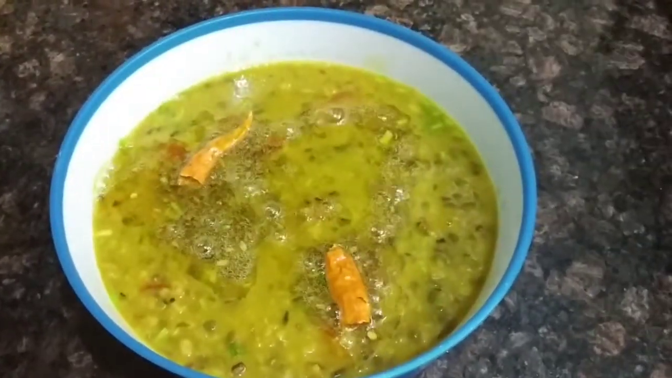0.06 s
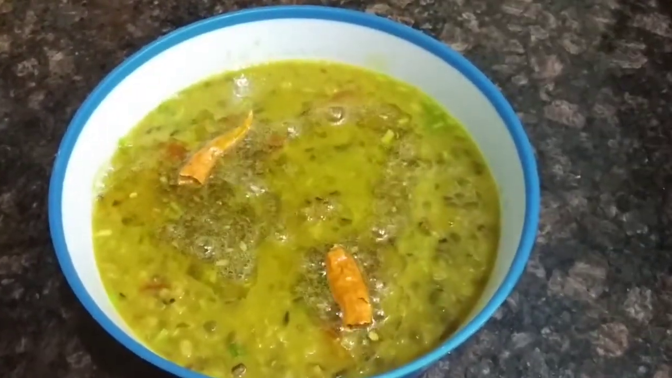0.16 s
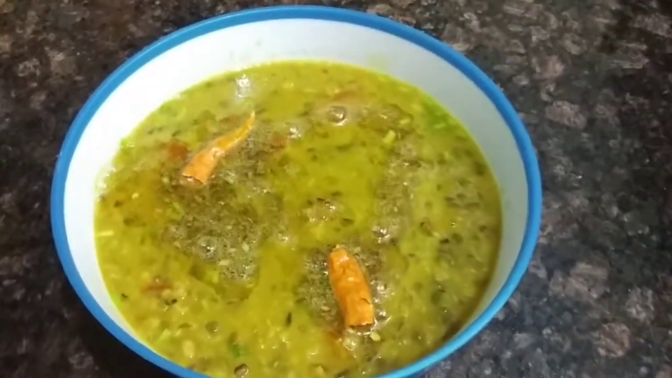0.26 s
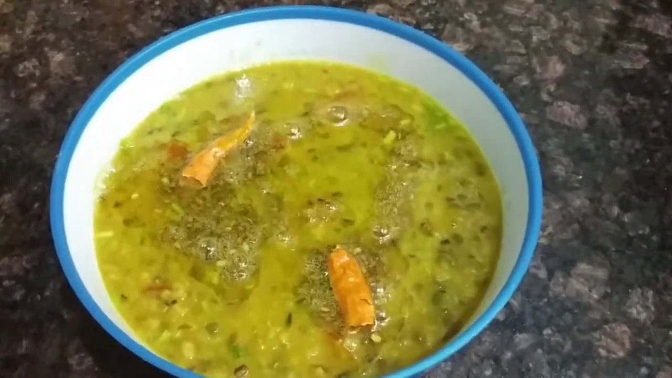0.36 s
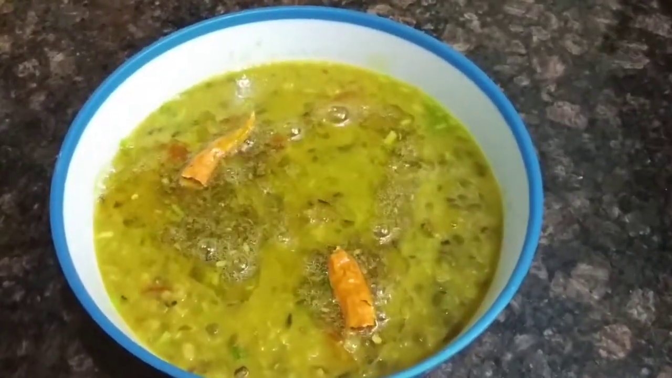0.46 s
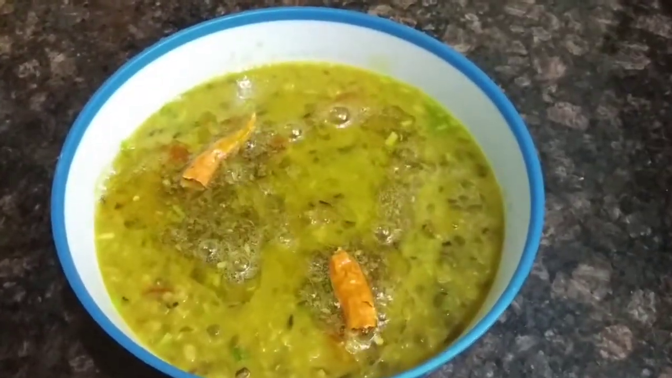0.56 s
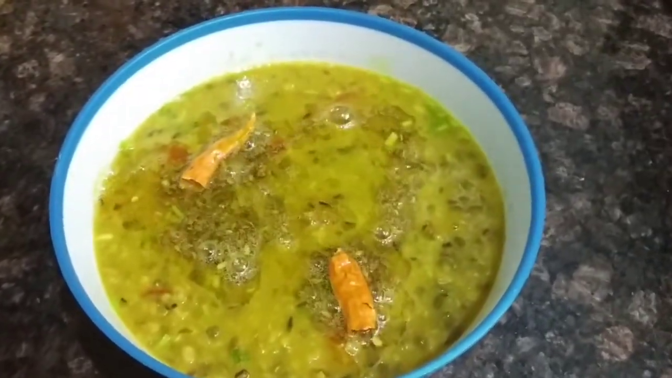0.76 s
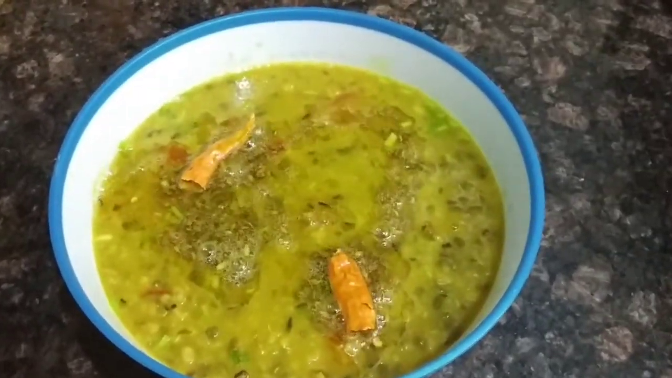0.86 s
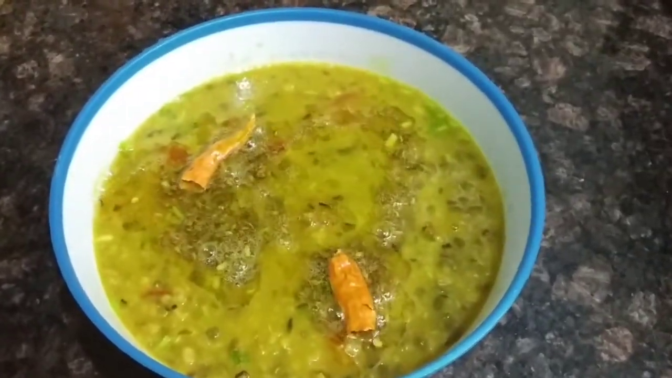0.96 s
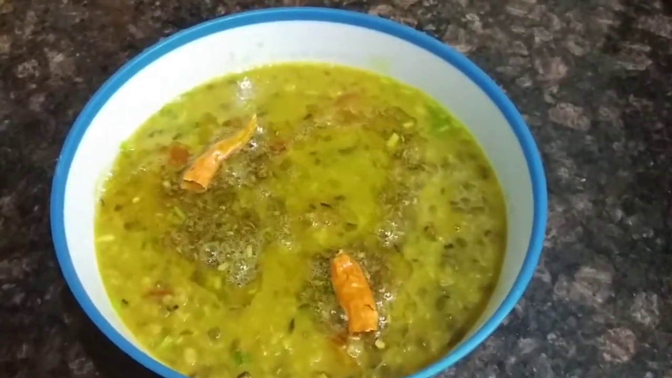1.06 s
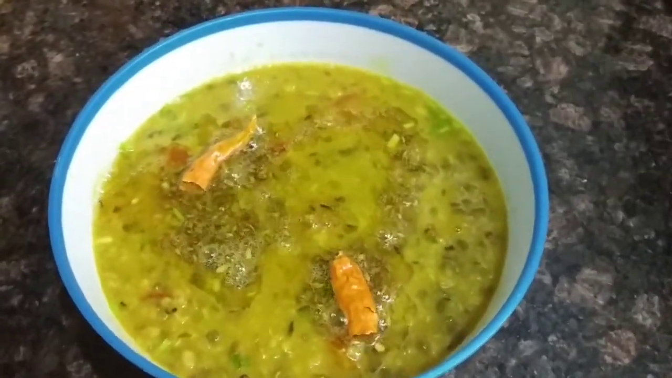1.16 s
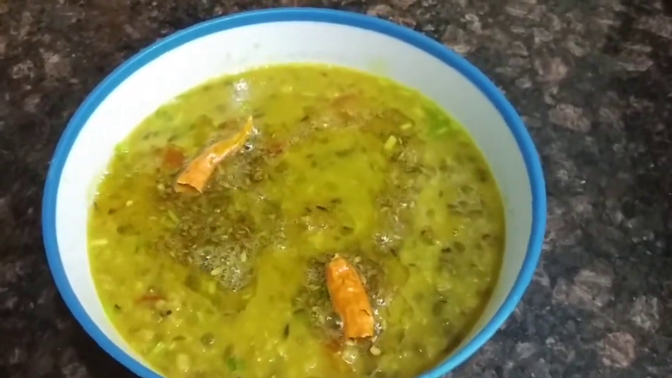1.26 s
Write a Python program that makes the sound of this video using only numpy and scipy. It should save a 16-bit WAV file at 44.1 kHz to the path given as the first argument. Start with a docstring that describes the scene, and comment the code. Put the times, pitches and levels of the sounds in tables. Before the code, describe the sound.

Hot oil sizzles and crackles on a bowl of lentils while a metal pan clunks down

```python
"""Hot oil dies down on a bowl of lentils: over faint room tone, a fizz of damped-sine grains and patchy hiss
is scattered throughout with bright pops, mostly to the right, each a spike and crack of band noise.
From 0.2 s a metal pan is knocked three times as it is set down: noise rattles and modes ring into the kitchen.
A low wavering sine swells with the later knocks, strongest just after the third, and then weakens.
Soft low bumps, damped sines, lie under the knocks and return near the end, with two faint pan contacts."""
import sys
import numpy as np
from scipy import signal
from scipy.fft import rfft, irfft, next_fast_len
from scipy.io import wavfile
from scipy.ndimage import uniform_filter1d, map_coordinates

SR = 44100
rng = np.random.default_rng(int(sys.argv[2]) if len(sys.argv) > 2 else 0)


def dump_mix(stems):
    """Bounce the given channels to the path in sys.argv[1] as a 16-bit WAV at rate SR."""
    frames = np.atleast_2d(stems).T  # one column per channel
    limited = np.clip(frames, -1, 1)  # hard clip at full scale
    pcm = np.round(limited * 32767).astype(np.int16)
    wavfile.write(sys.argv[1], SR, pcm)


N = 59535

# likeness (correlation) of the left and right channels: f/Hz, correlation/1
LIKENESS = [(60, -0.02), (240, 0.84), (950, 0.12), (3770, 0.0031), (15000, 0.17)]


def amp(db):
    """Level definition: decibels to an amplitude ratio."""
    return 10 ** (np.asarray(db) / 20)


def unit(x):
    """Normalisation to unit root-mean-square value."""
    return x / np.sqrt(np.mean(x ** 2) + 1e-20)


def along(points, hz):
    """Linear interpolation of (f/Hz, value) points on a logarithmic frequency axis."""
    f, v = np.transpose(points)
    return np.interp(np.log(hz + 1), np.log(f + 1), v)


def curve(rows, axis=1):
    """Linear interpolation in time of one column of a table, one value per sample."""
    return np.interp(np.arange(N) / SR, *np.transpose(rows)[[0, axis]])


def wobble(rate):
    """Band-limited random fluctuation: a smooth curve through rate random knots a second."""
    knots = rng.standard_normal(int(N * rate / SR) + 4)
    return map_coordinates(knots, [np.arange(N) * rate / SR])


def filtered(x, response):
    """Linear filtering: the spectrum of x times a response of frequency."""
    m = next_fast_len(N + SR // 2)
    return irfft(rfft(x, m) * response(np.fft.rfftfreq(m, 1 / SR)), m)[..., :N]


def pan(db):
    """Interchannel level difference: positive to the left, negative to the right."""
    return amp([[db / 2], [-db / 2]])


def half_angle(hz):
    """Mid-side mixing angle theta, for a channel correlation of cos(2 theta)."""
    return np.arccos(np.clip(along(LIKENESS, hz), -1, 1)) / 2


def spread(pair, gain):
    """Partial coherence: two unrelated signals, coloured by gain, become mid and side."""
    def mid_side_gain(hz):
        return gain(hz) * [np.cos(half_angle(hz)), np.sin(half_angle(hz))]

    mid, side = filtered(pair, mid_side_gain)
    return np.array([mid + side, mid - side])


def patchy(patch_db):
    """Time-frequency modulation: two unrelated noises with shared patches of random gain."""
    z = signal.stft(rng.standard_normal((2, N)), nperseg=256)[2]
    field = rng.standard_normal(z.shape[1:])
    field = uniform_filter1d(uniform_filter1d(field, size=4, axis=0), size=9, axis=1)
    return signal.istft(z * amp(patch_db * unit(field)), nperseg=256)[1][:, :N]


def blips(s, gain, hz, cycles, phase, size):
    """Damped free oscillation: sines that fall 60 dB in 4 * cycles periods, summed into one track."""
    periods = np.arange(size) / SR * hz[:, None]
    envelope = amp(-60 * periods / (4 * cycles)) * (1 - np.exp(-4 * periods))
    wave = gain[:, None] * np.sin(2 * np.pi * periods + phase[:, None]) * envelope
    at = (s * SR).astype(int)[:, None] + np.arange(size)
    return np.bincount(at.ravel(), wave.ravel(), N + size + SR)[:N]


def room(x):
    """Reverberation: convolution with noise whose decay time depends on frequency."""
    # kitchen decay: f/Hz, t60/s
    kitchen = [(100, 0.23), (500, 0.69), (2000, 0.4), (6000, 0.34), (15000, 0.5)]
    noise = rng.standard_normal((2, SR * 3 // 4))
    hz, t, z = signal.stft(noise, SR, nperseg=256)
    decay = amp(-60 * t / along(kitchen, hz)[:, None])
    tail = signal.istft(z * decay, SR, nperseg=256)[1]
    tail = spread(tail, np.ones_like)
    delayed = np.pad(x, ((0, 0), (200, 0)))  # the tail starts 200 samples late
    return signal.fftconvolve(delayed, tail / np.linalg.norm(tail[0]), axes=1)[:, :N]


def air():
    """Stationary ambient noise: room tone with a fixed spectrum and a slight level waver."""
    # relative spectrum of the room tone: f/Hz, level/dB
    air_spectrum = [(12, -41), (20, -8), (85, -3.5), (157, -17), (324, -12.5), (1140, -25.5), (2930, -25),
                    (3370, -31.5), (5880, -31), (10300, -28), (15600, -31.5)]
    tone = spread(patchy(patch_db=2.5), lambda f: amp(along(air_spectrum, f)))
    return amp(-63.5 + 0.5 * wobble(12.5)) * pan(-2.5) * unit(tone)


def hum():
    """Narrow-band modulation: a nearly pure low tone wavers in phase and level."""
    # mean level of the hum: t/s, level/dB
    hum_level = [(0.0, -59), (0.228, -59), (0.402, -58), (0.458, -54.5), (0.56, -57), (0.654, -50.5),
                 (0.748, -59), (0.984, -65.5), (1.022, -73), (1.066, -65), (1.214, -79.5), (1.266, -63.5),
                 (1.312, -68), (1.35, -59)]
    hum_hz, waver_db = 82.4, 2
    phase = 2 * np.pi * hum_hz * np.arange(N) / SR + 0.9 * wobble(8.87)
    level = amp(curve(hum_level) + waver_db * wobble(21.5))
    return np.sqrt(2) * level * np.sin(phase) * pan(-3)


def bumps():
    """Heavily damped oscillation: each soft low thud dies within a few periods."""
    # thuds: t/s, level before damping/dB, f/Hz
    thuds = [(.2, -46, 30.4), (.61, -45, 40), (.66, -52, 50), (1.125, -43.5, 29.2), (1.202, -45.5, 46.6),
             (1.243, -49, 28.3), (1.291, -45, 40.6)]
    s, db, hz = np.transpose(thuds)
    return blips(s, amp(db), hz, cycles=0.88, phase=0 * s, size=SR // 4) * pan(-1)


def knocks():
    """Modal excitation by impact: each contact snaps, rings the pan's modes and leaves a fading rattle."""
    # pan contacts: t/s, level/dB, rattle length/s, fade t60 during the rattle/s, centre f/Hz,
    # breadth/octave, ring level re contact/dB, left-right difference/dB
    contacts = [(0.186, -49, 0.0059, .1, 1480, 1.15, -4, 10.5), (0.198, -44, 0.031, 0.2, 800, 1.35, -2, 0),
                (.4355, -51.5, 0.018, 0.11, 800, 0.48, 3, 7.5),
                (0.4367, -55, 0.03, 0.27, 2830, 0.41, -9, 6),
                (0.441, -54.5, 0.034, 0.18, 250, 0.86, 1.5, 1), (0.446, -46, 0.02, 0.17, 764, 0.59, 2.5, 0),
                (0.5936, -55.5, 0.0061, .1, 6300, 1.6, 3, -17),
                (0.5989, -35, 0.015, 0.15, 4000, 2.13, 6.5, -3), (.607, -36, 0.091, .3, 920, 2.5, -2, -6),
                (0.602, -50, 0.111, 0.65, 5600, 0.69, -13, -11),
                (0.617, -43.5, 0.044, 0.18, 380, 0.66, 4, -2.5),
                (0.628, -41, 0.031, 0.45, 800, 1.74, 0.5, -5),
                (0.646, -43, 0.027, 0.28, 1230, 1.28, -2, -11.5),
                (0.976, -65, 0.0056, 0.15, 2480, 0.5, -22, -3),
                (1.199, -55.5, 0.012, 0.079, 1800, 0.45, -15, 0)]
    # relative spectrum of the pan's snap and rattle: f/Hz, level/dB
    pan_spectrum = [(59, -23), (100, -1.5), (166, -12), (387, -8), (1040, -13.5), (1730, -9), (2940, -16),
                    (6420, -19), (9200, -28.5), (15600, -28.5)]
    # modes of the pan: f/Hz, mean relative level/dB, t60/s
    modes = [(186.5, -5.5, 0.29), (232.7, 1, .15), (273.8, -0.5, 0.38), (372.2, 0, 0.25), (509.6, -1, 0.23),
             (607, 0, 0.12), (720, -2, 0.24), (800, -5, 0.29), (913, -3, 0.16), (1166, -4.5, 0.067),
             (1316, -2.5, 0.21), (1492, -12, 0.083), (1677, -5, 0.23), (1800, -12, 0.42), (2214, -4, 0.15),
             (2474, -8, 0.3), (3953, -3, 0.15), (4727, -4, 0.18), (5640, -4, 0.083), (6300, 7, 0.062)]
    release_s = 0.04  # t60 of the extra decay once the rattle length is over
    rattle_scatter_db, mode_scatter_db = 3, 2
    snap_db = 1  # re contact level
    mode_rise_s, mode_waver_rad = 0.0022, 0.65
    out, t = np.zeros((2, N)), np.arange(N) / SR
    mode_hz, mode_db, mode_t60 = (column[:, None] for column in np.transpose(modes))
    for s, db, length, t60, hz, breadth, ring_db, side_db in contacts:
        start = int(s * SR)

        def colour(f):
            return np.exp(-(np.log2((f + 1) / hz) / breadth) ** 2 / 2)

        def tone(f):
            return colour(f) * amp(along(pan_spectrum, f))

        fade_db = -60 * np.abs(t - s) / t60
        release_db = -60 * np.clip(t - s - length, 0, None) / release_s
        shape = (t > s) * amp(fade_db + release_db)
        rough_noise = patchy(patch_db=5.0) * amp(rattle_scatter_db * wobble(400))
        body = spread(rough_noise, tone) * shape
        body *= np.linalg.norm(shape) / np.linalg.norm(body, axis=1, keepdims=True)

        snap = -filtered(1. * (np.arange(N) == start + 30), tone)
        body += amp(snap_db) * snap / np.abs(snap).max()

        age = np.clip(t - s, 0, None)[start:][:SR // 2]
        luck = rng.standard_normal((len(modes), 3, 1))
        gain = amp(mode_db + mode_scatter_db * luck[:, 0]) * colour(mode_hz)
        gain = gain / np.linalg.norm(amp(mode_db) * colour(mode_hz))
        gain = gain * amp(-60 * age / mode_t60) * (1 - np.exp(-age / mode_rise_s))
        waver = mode_waver_rad * np.array([wobble(40.5)[:len(age)] for _ in modes])
        phase = 2 * np.pi * mode_hz * age + 10 * luck[:, 2] + waver
        apart = half_angle(mode_hz) * luck[:, 1]  # opposite phase shifts left and right
        ring = np.array([(gain * np.sin(phase + k * apart)).sum(0) for k in (1, -1)])
        body[:, start:][:, :len(age)] += amp(ring_db) * ring
        out += amp(db) * pan(side_db) * body
    return out


def fizz(count=2000):
    """Superposed bubble pulses: equal damped grains over fine hiss, in a low and a high band that swell apart."""
    # fizz levels: t/s, low-band level/dB, high-band level/dB (both before the grain and hiss offsets)
    fizz_levels = sum([ [(0.0, -71, -65), (0.018, -93, -61.5), (0.04, -54, -58), (0.104, -61, -60),
                   (0.132, -57, -59), (0.16, -63, -68), (0.19, -56, -50), (0.302, -62, -69),
                   (0.368, -54, -50), (0.454, -62.5, -84), (0.514, -61, -81), (0.552, -60, -49),
                   (0.585, -72, -63)], [(0.74, -66, -57), (0.86, -64, -61.5), (0.926, -63.5, -58),
                   (0.97, -62, -58), (0.984, -57.5, -65), (1.008, -67, -70), (1.094, -99, -87),
                   (1.12, -53, -65), (1.13, -57.5, -60), (1.246, -73, -82), (1.272, -62, -51.5),
                   (1.32, -74, -77), (1.35, -65, -58)], ], [])
    # low and high band: centre f/Hz, width in natural-log frequency/1
    bands = [(5700, 0.28), (10500, 0.34)]
    grain_db, hiss_db = -8, -12
    out = np.zeros((2, N))
    for k, (centre_hz, width) in enumerate(bands):
        def band(f):
            return np.exp(-(np.log((f + 1) / centre_hz) / width) ** 2 / 4)

        start = rng.uniform(size=count) * N / SR
        turn = 2 * np.pi * rng.uniform(size=count)
        hz = np.clip(centre_hz * np.exp(width * rng.standard_normal(count)), 2000, 15500)
        # a different phase in each channel sets the two apart
        grains = np.array([blips(start, np.ones(count), hz, cycles=2.25, phase=channel * turn, size=128)
                           for channel in (1, 2)])
        hiss = filtered(patchy(patch_db=4), band)
        level = amp(curve(fizz_levels, axis=k + 1) + 1.3 * wobble(40))
        out += level * (amp(hiss_db) * unit(hiss) + amp(grain_db) * unit(grains))
    return out * pan(-3.5)


def pops():
    """Impulsive radiation by bursting steam bubbles: a spike and short crack of band noise in fainter hiss."""
    # oil pops: t/s, level in the louder channel/dB, centre f/Hz, left-right difference/dB,
    # breadth in natural-log frequency/1
    bursts = sorted([(0.0166, -43.5, 10670.0, -10, 0.099), (0.0222, -47.5, 9500, -12, 0.09),
              (0.0443, -50, 6260, -20, 0.2), (0.0891, -50.5, 5440, -25, 0.11),
              (0.1008, -46.9, 5900, -35, 0.2), (0.1183, -42.5, 5940, -9.6, 0.086),
              (0.1235, -42, 8900, -27, 0.27), (0.1313, -40, 9200, -11, 0.12), (0.135, -44, 8650, -16, 0.19),
              (0.1432, -49, 8880.0, -10.2, 0.27), (0.1846, -44, 7500, 0.5, 0.17),
              (0.2247, -44, 7950, -13, 0.48), (0.2287, -39, 10600, -17.8, 0.052),
              (0.2548, -51, 6740, -17, 0.19), (0.26, -53, 8880.0, -5, 0.3),
              (0.3265, -43, 11100, -10.0, 0.26), (0.3372, -49, 10800, 0, 0.26),
              (0.3419, -47.6, 9000.0, -10, 0.72), (0.362, -35.5, 4850, -10, 0.95),
              (0.371, -54, 9300, -18, 0.49), (0.374, -32.5, 12300, -16, 0.2),
              (0.3786, -54, 11100, -12, 0.38), (0.383, -55, 10350.0, -13, 0.4),
              (0.3881, -63, 9060, -11.4, 0.38), (0.4062, -60, 8950.0, -9, 0.2),
              (0.4298, -43, 4460, -18, 0.43), (0.4434, -47.5, 4460, 0, 0.27),
              (0.462, -47.5, 7130.0, -1.5, 0.59), (0.5338, -51, 11200, -20, 0.16),
              (0.538, -48, 6030, -14.0, 0.077), (0.5433, -42.5, 11600, -14, 0.18),
              (0.5552, -37.5, 10500, -8, 0.082), (0.5724, -61, 10890.0, -9, 0.31),
              (0.8906, -51, 7500, -9, 0.33), (0.9162, -49.5, 6580.0, -9.4, 0.23),
              (0.9191, -47.5, 10220.0, -4, 0.34), (0.9279, -46, 7360.0, -9.2, 0.28),
              (0.9844, -47.5, 5410.0, -0.5, 0.15), (1.1212, -40, 6300, -17, 0.091),
              (1.1261, -47, 6240.0, -5, 0.14), (1.1378, -52, 7050, -0.7, 0.13),
              (1.2013, -50.5, 6800, -2, 0.68), (1.2546, -53, 8100, -12, 0.14), (1.2584, -49, 8100, 2, 0.14),
              (1.2698, -43.5, 6270, -10, 0.16), (1.2758, -56, 8690.0, 0, 0.24), (1.2861, -47, 8100, 0, 0.3),
              (1.332, -47, 12080.0, -8.9, 0.16)] + [(.3735, -44, 3370, -8, 0.074),
              (.4215, -53, 6100, 4, 0.17), (.4735, -56, 10000, -10, 0.35), (.3065, -51, 10500, -3, 0.25),
              (1.106, -50.5, 8000, -14, .3), (1.2255, -53, 11100, 4, .3), (1.2495, -63, 9900, 0, .25)])
    crack_s = 0.00031  # half length, to 1/e
    spike_db, hiss_db = 3.5, -10.5  # re pop level
    hiss_swell_s, hiss_fade_s = 0.012, 0.054  # t60 before and after the pop
    low_cut_hz = 2600
    out, t = np.zeros((2, N)), np.arange(N) / SR
    for s, db, hz, side_db, width in bursts:
        def band(f):
            bell = np.exp(-(np.log((f + 1) / hz) / width) ** 2 / 4)
            return bell / (1 + (low_cut_hz / (f + 1)) ** 8)

        noise = unit(filtered(rng.standard_normal((2, N)), band))
        window = np.exp(-((t - s) / crack_s) ** 2)
        crack = noise * window
        crack *= np.linalg.norm(window) / np.linalg.norm(crack, axis=1, keepdims=True)

        turn = np.exp(2j * np.pi * rng.uniform(size=(2, 1)))  # random phase in each channel
        spike = filtered(1. * (np.arange(N) == int(s * SR)), lambda f: turn * band(f))
        spike *= amp(spike_db) / np.abs(spike).max()

        distance = np.where(t > s, (t - s) / hiss_fade_s, (s - t) / hiss_swell_s)
        hiss = noise * amp(hiss_db - 60 * distance)
        out += amp(db - abs(side_db) / 2) * pan(side_db) * (spike + crack + hiss)
    return out


def scene():
    """Linear superposition of the direct sources and the kitchen's reverberation."""
    metal, oil = knocks(), pops()
    wet = amp(-9) * room(metal) + amp(-8.5) * room(oil)
    return air() + hum() + bumps() + fizz() + metal + oil + wet


def record(dry):
    """Band limitation: an ideal low-pass keeps only what lies below 15750 Hz."""
    return filtered(dry, lambda hz: hz < 15750)


dry = scene()
out = record(dry)
dump_mix(out)
```